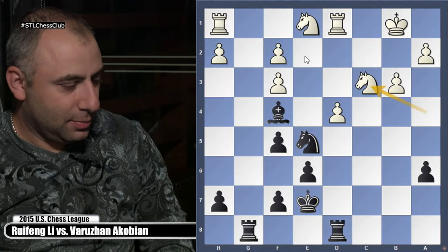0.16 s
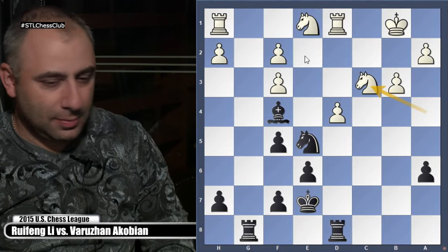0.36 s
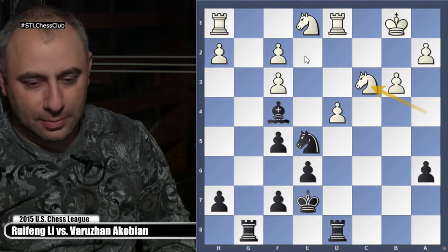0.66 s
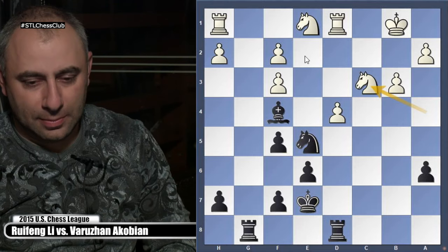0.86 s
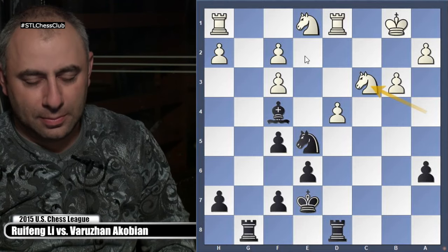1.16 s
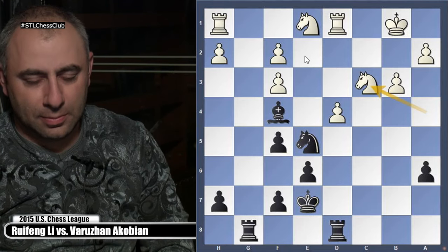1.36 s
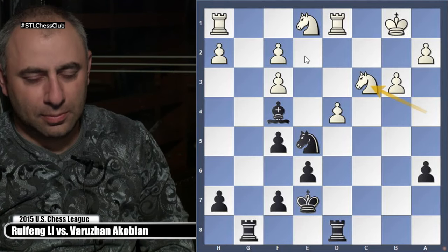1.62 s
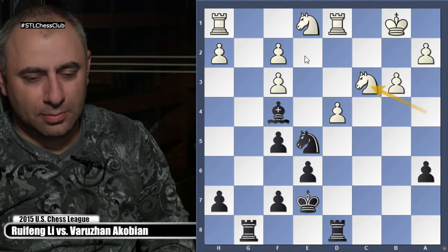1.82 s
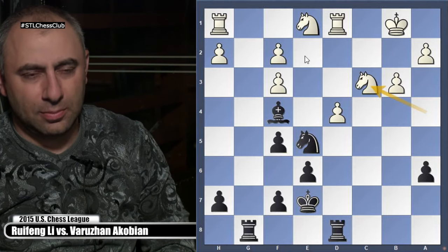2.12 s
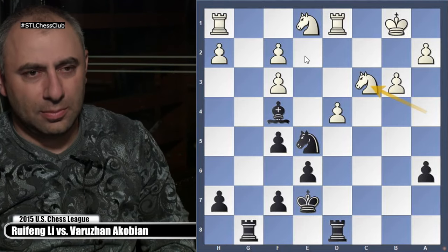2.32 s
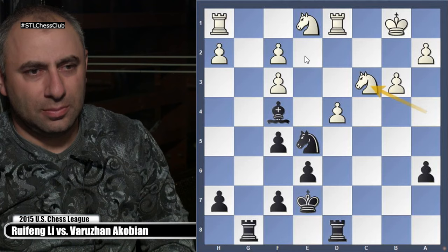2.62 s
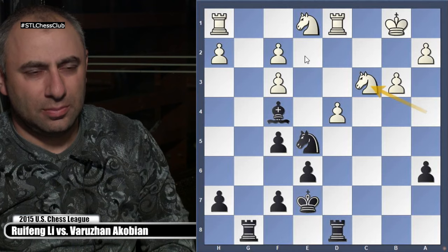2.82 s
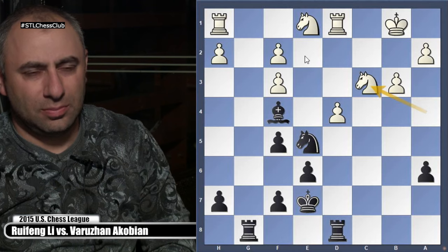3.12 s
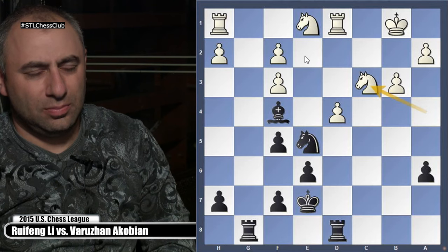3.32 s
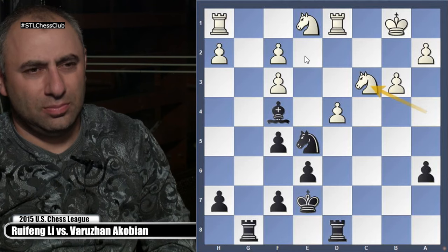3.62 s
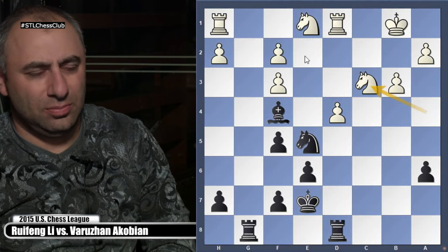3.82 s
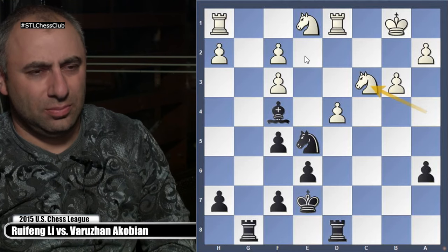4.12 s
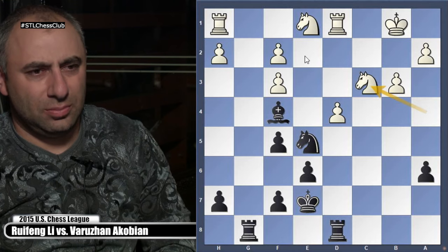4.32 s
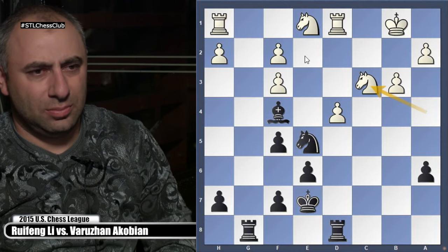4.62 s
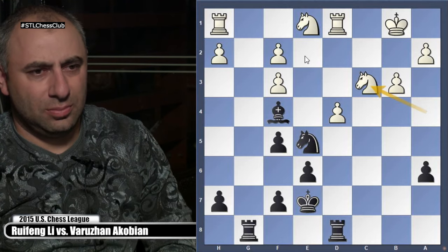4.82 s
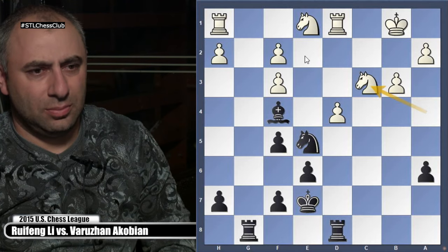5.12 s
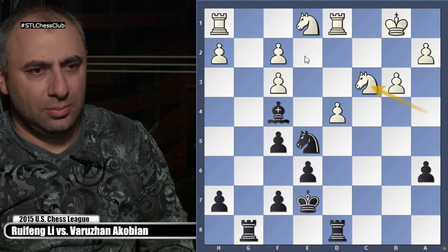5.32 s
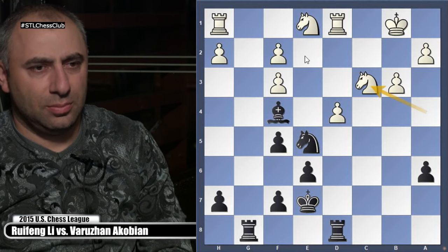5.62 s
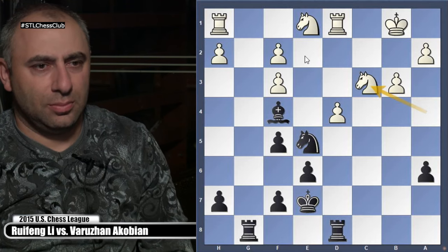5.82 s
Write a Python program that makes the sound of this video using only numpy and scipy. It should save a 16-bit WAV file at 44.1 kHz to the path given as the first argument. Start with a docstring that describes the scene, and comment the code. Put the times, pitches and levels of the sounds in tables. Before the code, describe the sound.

Fingers faintly rub a metal drink can and tick on its tab, close to the microphone in a room with low ventilation rumble. The seam cracks and lets out a short spurt of gas, then cracks again with a thin hissing leak. A few small clicks build to one loud, sharp pop as the lid opens. The drink fizzes very faintly while the tab taps lightly on the lid.

```python
"""Faint rubbing and ticks over a low ventilation rumble: a can of fizzy drink is eased open close by.
The tab ticks on the taut lid; the seam cracks and lets out a spurt of gas, later a thin leak.
The score line yields in steps, then the panel tears open with one loud pop.
The drink fizzes faintly while the tab is bent back, tapping the slack lid."""
import sys
import numpy as np
from scipy import signal
from scipy.fft import rfft, irfft
from scipy.io import wavfile
from scipy.ndimage import uniform_filter1d

SR = 44100
rng = np.random.default_rng(int(sys.argv[2]) if len(sys.argv) > 2 else 0)


def file_out(sig):
    """Save sig as 16-bit WAV at sys.argv[1]."""
    # one column per channel
    cols = np.atleast_2d(sig).T
    # limit, then scale
    lim = np.clip(cols, -1, 1)
    pcm = np.round(lim * 32767).astype(np.int16)
    wavfile.write(sys.argv[1], SR, pcm)


N = 262836
TIME_S = np.arange(N) / SR
BLOW_S = TIME_S[:SR // 8]
SPURT_S, LEAK_S, POP_S = 1.183, 2.587, 3.8406

# Noise spectra: freq_hz, relative_density_db
VENT_SPECTRUM = [(8.8, -36), (15, 0), (36, -0.5), (91, -19), (103, -24), (145, -23.5), (212, -29),
                 (246, -25.5), (440, -33.5), (480, -31), (661, -37.5), (1050, -41), (2450, -53),
                 (3680, -56), (15800, -68)]
REVERB_SPECTRUM = [(200, -1), (1200, 7), (3000, -4.5), (7000, 0.5), (15000, 5.5)]
FIZZ_SPECTRUM = [(1500, -21), (3200, 1), (6200, -2), (10000, -7), (15500, -10)]
RUB_SPECTRUM = [(600, -9.5), (1250, -5), (1680, -2), (2200, -7.5), (3150, 1), (4500, -8), (5500, -10),
                (6200, -8.5), (7500, -17), (15000, -26)]
GRIP_SPECTRUM = [(70, -25), (130, 5), (190, -2), (300, -9), (800, -18.5), (2000, -37.5), (10000, -69)]
KNOCK_SPECTRUM = [(200, -9), (550, 4.5), (900, 1.5), (1250, -2.5), (1600, -0.5), (2200, -26.5), (5000, -43)]
SPURT_SPECTRUM = [(450, -36.5), (800, -15), (2000, -18.5), (2800, -6.5), (3600, -4), (5200, -4),
                  (6500, -1.5), (7600, -4), (9000, -1), (11000, -4), (13500, -2.5), (15300, -3)]
FLUTTER_SPECTRUM = [(300, -16), (480, -4.5), (630, 5), (850, -5), (1200, -12.5), (2200, -30), (4000, -35),
                    (12000, -62)]
CRACK_SPECTRUM = [(400, -11.5), (1800, -13.5), (3200, 0), (6000, 0.5), (8500, -8.5), (13000, -13.5),
                  (16000, -18.5)]
TEAR_SPECTRUM = [(150, -44.5), (330, -25.5), (540, -16.5), (800, -17), (1020, -15.5), (1400, -7),
                 (1800, -15), (2600, -2.5), (3900, 1), (4600, -8.5), (6300, -4.5), (8500, -15),
                 (15800, -18.5)]
POP_SPREAD_SPECTRUM = [(200, -36.5), (550, -15.5), (800, -19), (1330, -3.5), (1700, -12.5), (2600, 0.5),
                       (3250, 3), (3900, -0.5), (4600, -8), (6300, -3), (8700, -16), (12500, -18),
                       (15800, -25)]   # averaged over all directions

# Metal modes: freq_hz, level_db, t60_s
TAUT_MODES = [(613, -22, .022), (1870, -22.5, 0.0065), (2690, -12, 0.016), (3120, -5, 0.014),
              (4250, -2, .01), (4970, -4, .007), (5900, -4.5, 0.0048), (6530, -8.5, 0.0088),
              (10400, -11.5, 0.0046), (12400, -10, 0.005)]   # lid under pressure
SLACK_MODES = [(1550, -11, 0.017), (1774, -6, 0.019), (2110, -12, 0.016), (2550, -10, 0.026),
               (3114, -1, 0.023), (3588, -22, .012), (4640, -16, 0.0079), (6120, -17, 0.016)]   # lid, pressure gone
PANEL_MODES = [(560, -19, 0.034), (1400, -17.5, 0.063), (2637, -0.5, .022), (3030, 3, 0.023),
               (3890, -6.5, 0.014), (5100, -11, .012), (6075, -0.5, .012)]   # panel snapping in

# Room decay: freq_hz, t60_s
ROOM_DECAY = [(250, .45), (1000, 0.47), (2800, 0.87), (5500, 0.53), (8000, .48), (11000, .38),
              (15000, 0.31)]
# Echoes off table and body: delay_s, gain_db
NEAR_ECHOES = [(.0021, -19), (.0046, -19.5), (.0088, -19.5), (0.0137, -25)]
# Finger strokes and tab scrapes: start_s, length_s, level_db
STROKES = [(0.24, 0.11, -72), (0.599, 0.18, -74.5), (0.818, 0.033, -54.5), (0.851, 0.13, -61.5),
           (1.863, .045, -55.5), (1.915, 0.38, -74), (3.061, 0.41, -63.5), (4.542, 0.063, -54),
           (5.2, .03, -60.5), (5.611, 0.029, -59.5)]
# Fingertip on the can wall: start_s, level_db
WALL_KNOCKS = [(0.826, -49), (4.519, -44.5), (5.041, -51.5)]
# Resonances of the leak: freq_hz, width_hz, level_db
SLIT_RESONANCES = [(2200, 200, -7.5), (3300, 580, 2.5), (5570, 450, 1), (6300, 500, 5.5), (7730, 760, 4),
                   (8750, 540, -4), (10400, 460, 1.5), (10800, 470, -3), (12500, 500, -5),
                   (13860, 400, -30)]
# Fingernail catching the tab: start_s, level_db
NAIL_TICKS = [(0.3664, -53), (1.9051, -47.5), (2.219, -52.5), (2.8898, -44.5), (3.1586, -38.5),
              (3.2829, -41.5), (3.3575, -45)]
# Seam cracking under pressure: start_s, level_db, ring_hz, ring_db, crack_db
SEAM_SNAPS = [(1.0639, -22.3, 5850, 12.5, -3.5), (1.0642, -42.5, 1680, 10.5, -14),
              (1.2134, -12.8, 3550, 7, -4), (1.2388, -23.5, 3400, 8, -2.5), (2.5695, -43, 3010, 7, -17),
              (2.5743, -32.5, 3160, 9, -12), (2.5762, -34.5, 3400, 7, -10), (2.5874, -12.5, 5740, 8.5, -4),
              (2.5879, -21, 12600, 18.5, -7), (2.6102, -23.5, 5000, 10.5, -9)]
# Score line yielding: start_s, level_db, ring_db
SCORE_YIELDS = [(3.6328, -34, -1.5), (3.6563, -43.5, 0.5), (3.693, -31.5, 2.5), (3.7579, -28, 2.5),
                (3.7738, -21.5, 8), (3.8223, -29.5, 4), (3.8298, -26.5, 2.5), (3.837, -23.5, 2)]
# Tab on the opened lid: start_s, level_db, ring_hz, ring_db, crack_db
TAB_TAPS = [(4.5508, -43, 3240, 5, 2), (4.5936, -37.5, 3240, 0, -3.5), (4.7968, -55, 2750, -2, -6),
            (5.0413, -41, 1727, 5, -9), (5.1354, -37.5, 3050, 8, -11), (5.192, -38.5, 3100, -4, -30),
            (5.2232, -50.5, 3120, 0, -14), (5.4711, -33.5, 2750, 1, -7), (5.6416, -37, 2660, 4, -22),
            (5.6458, -35.5, 3300, 6, -29), (5.6657, -40.5, 2780, 14, -10)]


def from_db(db):
    """Decibels to gain."""
    return 10 ** (np.asarray(db) / 20)


def unit_rms(x):
    """Scale to rms 1."""
    return x / np.sqrt(np.mean(x ** 2) + 1e-20)


def at_hz(points, hz):
    """Read a table on a log-frequency axis."""
    freqs, values = np.transpose(points)
    return np.interp(np.log(np.maximum(hz, 1)), np.log(freqs), values)


def add(track, start_s, sound):
    """Mix a sound into the track."""
    start = int(round(start_s * SR))
    track[start:start + len(sound)] += sound[:N - start]


def fade(t60_s):
    """Free decay of one blow."""
    return from_db(-60 * BLOW_S / t60_s)


def envelope(start_s, attack_s, hold_s, t60_s):
    """Gain that rises, holds, then dies away."""
    age_s = np.maximum(TIME_S - start_s, 0)
    return (1 - np.exp(-age_s / attack_s)) * from_db(-60 * np.maximum(age_s - hold_s, 0) / t60_s)


def noise(spectrum, size=N):
    """Shaped noise, rms 1."""
    hz = np.arange(size // 2 + 1) * SR / size
    return unit_rms(irfft(rfft(rng.standard_normal(size)) * from_db(at_hz(spectrum, hz)), size))


def burst(spectrum, t60_s):
    """Decaying puff of noise with a smooth spectrum."""
    puff = rfft(rng.standard_normal(len(BLOW_S)) * fade(t60_s))
    hz = np.arange(len(puff)) * SR / len(BLOW_S)
    shaped = irfft(puff / np.abs(puff) * from_db(at_hz(spectrum, hz)), len(BLOW_S))
    tapered = shaped * np.sqrt(fade(2 * t60_s))
    return unit_rms(tapered) * np.sqrt(np.mean(fade(t60_s) ** 2))


def mode(hz, t60_s):
    """One struck resonance; thin metal radiates almost nothing far below it."""
    motion = fade(t60_s) * np.sin(2 * np.pi * hz * BLOW_S)
    return np.gradient(motion) / np.sin(2 * np.pi * min(hz, SR / 4) / SR)


def ring(modes, detune):
    """Modes of alternating sign; the flexing lid retunes them slightly at each blow."""
    return sum((-1) ** k * from_db(db) * mode(hz * (1 + detune * rng.standard_normal()), t60_s)
               for k, (hz, db, t60_s) in enumerate(modes))


def ventilation(level_db):
    """Steady low rumble of air."""
    return from_db(level_db) * noise(VENT_SPECTRUM)


def room(direct, outward, wet_db, build_s):
    """Direct sound, its near echoes, and a diffuse tail fed by what radiates outward."""
    age_s, hz = TIME_S[:SR], np.arange(SR // 2 + 1)
    diffuse = rfft(noise(REVERB_SPECTRUM, size=SR))
    centres_hz = np.geomspace(125, 16000, 15)
    tail = np.zeros(SR)
    for centre_hz, band in zip(centres_hz, np.eye(len(centres_hz))):
        decay = from_db(-60 * age_s / at_hz(ROOM_DECAY, centre_hz))
        tail += irfft(diffuse * np.interp(hz, centres_hz, band), SR) * decay
    tail *= 1 - np.exp(-age_s / build_s)
    tail *= from_db(wet_db) / np.sqrt(np.sum(tail ** 2))
    out = direct + signal.fftconvolve(outward, tail)[:N]
    for delay_s, db in NEAR_ECHOES:
        add(out, delay_s, from_db(db) * direct)
    return out


def fizz(rate_per_s, steady_db, surge_db, settle_s):
    """Tiny uneven bubbles burst at random in the open can; the first surge soon settles."""
    bubbles = (rng.random(N) < rate_per_s / SR) * rng.standard_normal(N)
    crackle = signal.fftconvolve(bubbles, burst(FIZZ_SPECTRUM, t60_s=.0072))[:N]
    surge = from_db(surge_db) * np.exp(-np.abs(TIME_S - POP_S) / settle_s)
    return (TIME_S > POP_S) * (from_db(steady_db) + surge) * unit_rms(crackle)


def fingers(grain_db, rest_db):
    """Skin catches and slides on the can in millisecond grains; the grip shifts, a fingertip knocks."""
    roughness = unit_rms(uniform_filter1d(rng.standard_normal(N), size=90))
    grains = unit_rms(from_db(grain_db * roughness))
    strokes = sum(from_db(db) * envelope(start_s, .15 * length_s, length_s, 2.5 * length_s)
                  for start_s, length_s, db in STROKES)
    rub = (from_db(rest_db) + strokes) * grains * noise(RUB_SPECTRUM)
    shudder = from_db(-41) * envelope(start_s=3.71, attack_s=.004, hold_s=.028, t60_s=.16)
    out = rub + shudder * noise(GRIP_SPECTRUM)
    for start_s, db in WALL_KNOCKS:
        add(out, start_s, from_db(db) * burst(KNOCK_SPECTRUM, t60_s=.044))
    return out


def slit_hiss(turbulence_db):
    """A narrow jet excites the slit's resonances; plain turbulence fills the valleys."""
    jet, hiss = rng.standard_normal(N), np.zeros(N)
    for hz, width_hz, db in SLIT_RESONANCES:
        radius = np.exp(-np.pi * width_hz / SR)
        feedback = [1, -2 * radius * np.cos(2 * np.pi * hz / SR), radius ** 2]
        hiss += from_db(db) * (1 - radius ** 2) / 2 * signal.lfilter([1, 0, -1], feedback, jet)
    return unit_rms(unit_rms(hiss) + from_db(turbulence_db) * noise(SPURT_SPECTRUM))


def gas(widest_s, widen_s):
    """A broad spurt; later a puff and a thin leak that swells and flutters as the slit widens."""
    hiss = slit_hiss(turbulence_db=-11)
    spurt = from_db(-25.2) * envelope(SPURT_S, attack_s=.025, hold_s=.058, t60_s=.13)
    puff = from_db(-29.5) * envelope(LEAK_S, attack_s=.0017, hold_s=.0024, t60_s=.067)
    flow = envelope(LEAK_S, attack_s=.003, hold_s=.372, t60_s=.23)
    opening = np.exp(-np.abs(TIME_S - widest_s) / widen_s)
    leak = puff + flow * from_db(-50.5 + 7 * opening)
    flutter = flow * from_db(-60.5 + 17 * opening)
    return spurt * noise(SPURT_SPECTRUM) + leak * hiss + flutter * noise(FLUTTER_SPECTRUM)


def tick(modes, ring_hz, ring_db, crack_db, ring_cycles, crack_t60_s):
    """A brief crack rings the lid, with one mode at ring_hz set by the load. Attack at rms 1."""
    load_mode = from_db(ring_db) * mode(ring_hz, t60_s=ring_cycles / ring_hz)
    sound = ring(modes, detune=.025) + load_mode
    sound += from_db(crack_db) * burst(CRACK_SPECTRUM, crack_t60_s)
    sound *= 1 - np.exp(-BLOW_S / .0003)   # a slip takes a moment to build
    return sound / sound[BLOW_S < .0022].std()


def opened_lid():
    """The tab taps the slack lid, which rings lower and longer than when taut."""
    out = np.zeros(N)
    for start_s, db, hz, ring_db, crack_db in TAB_TAPS:
        tap = tick(SLACK_MODES, hz, ring_db, crack_db, ring_cycles=45, crack_t60_s=.021)
        add(out, start_s, from_db(db) * tap)
    return out


def sealed_lid(nail_hz, softening_exponent):
    """Light nail ticks, dry seam snaps, then yields that fall in pitch as the panel softens."""
    out = np.zeros(N)
    for start_s, db in NAIL_TICKS:
        nail = tick(TAUT_MODES, nail_hz, ring_db=-4, crack_db=-8.5, ring_cycles=50, crack_t60_s=.014)
        add(out, start_s, from_db(db) * nail)
    for start_s, db, hz, ring_db, crack_db in SEAM_SNAPS:
        snap = tick(TAUT_MODES, hz, ring_db, crack_db, ring_cycles=34, crack_t60_s=.016)
        add(out, start_s, from_db(db) * snap)
    for start_s, db, ring_db in SCORE_YIELDS:
        hz = 4290 * (POP_S - start_s) ** softening_exponent
        slip = tick(TAUT_MODES, hz, ring_db, crack_db=1, ring_cycles=58, crack_t60_s=.016)
        add(out, start_s, from_db(db) * slip)
    return out


def pop(tear_db, tear_t60_s, gush_db, gush_t60_s, spread_db):
    """The score tears, the panel snaps in, the last gas gushes: head-on, and as sent into the room."""
    panel = ring(PANEL_MODES, detune=.004)
    tear = from_db(tear_db) * burst(TEAR_SPECTRUM, tear_t60_s)
    gush = from_db(gush_db) * burst(TEAR_SPECTRUM, gush_t60_s)
    head_on, all_round = np.zeros(N), np.zeros(N)
    add(head_on, POP_S, panel + tear + gush)
    add(all_round, POP_S, from_db(spread_db) * burst(POP_SPREAD_SPECTRUM, tear_t60_s))
    return head_on, all_round


def scene():
    """The can in the room, over the ventilation; mono."""
    sealed = sealed_lid(nail_hz=4050, softening_exponent=.07)
    head_on, all_round = pop(tear_db=4, tear_t60_s=.025, gush_db=-16, gush_t60_s=.1, spread_db=4.5)
    fully_sent = opened_lid() + gas(widest_s=2.8, widen_s=.09)
    fully_sent += fizz(rate_per_s=3000, steady_db=-74.5, surge_db=-68.5, settle_s=.35)
    fully_sent += fingers(grain_db=2.5, rest_db=-77)
    outward = fully_sent + all_round + from_db(-3.5) * sealed   # the sealed lid radiates mostly toward the listener, less into the room
    can = room(fully_sent + head_on + sealed, outward, wet_db=-11, build_s=.0022)
    return (can + ventilation(level_db=-37))[None]


def record(dry):
    """The pop clips at full scale; a steep low-pass cuts the top."""
    cutoff_hz = 15900
    lowpass = signal.ellip(12, .1, 70, cutoff_hz, fs=SR, output="sos")
    return signal.sosfilt(lowpass, np.clip(dry, -1, 1))


dry = scene()
out = record(dry)
file_out(out)
```